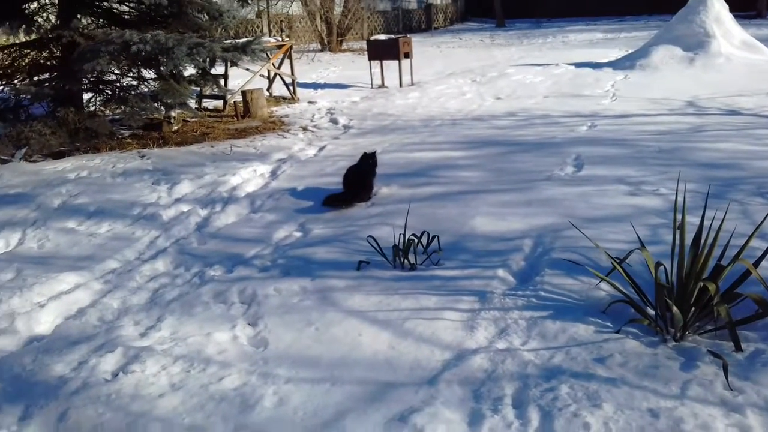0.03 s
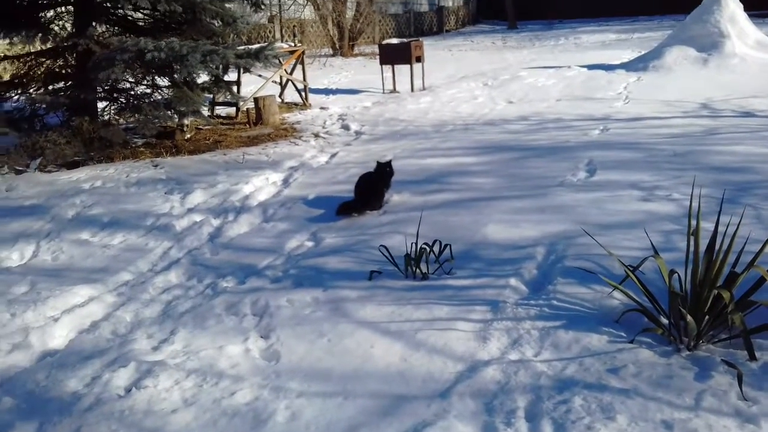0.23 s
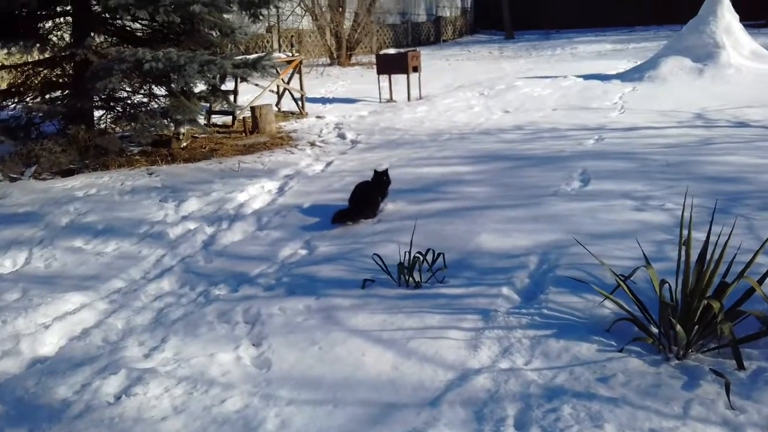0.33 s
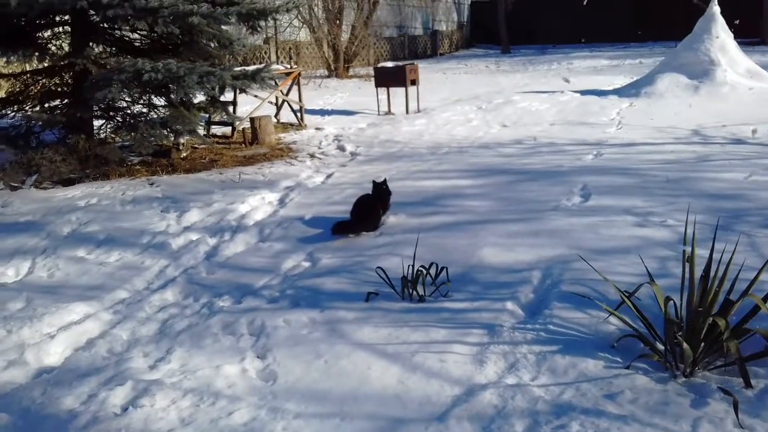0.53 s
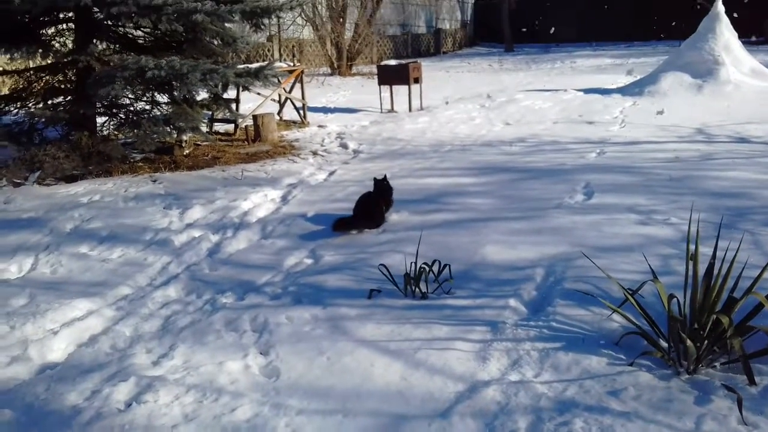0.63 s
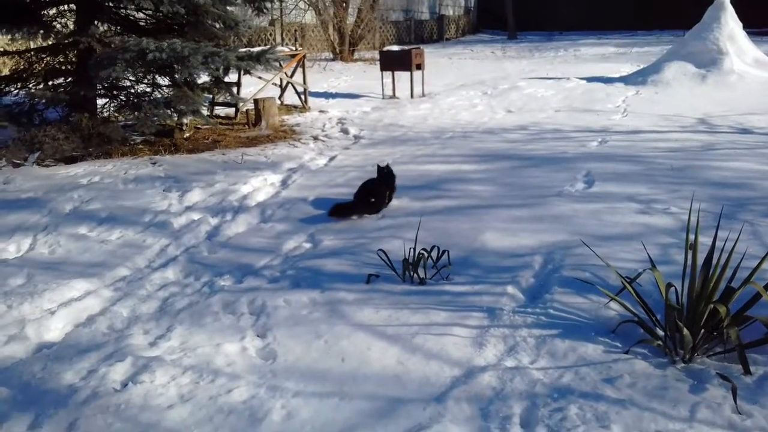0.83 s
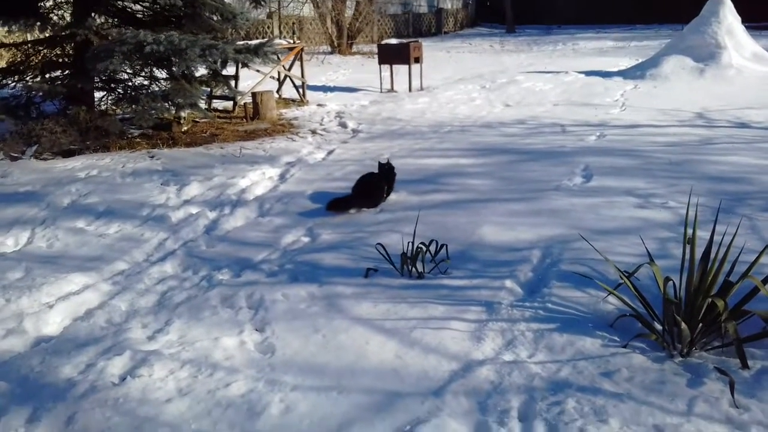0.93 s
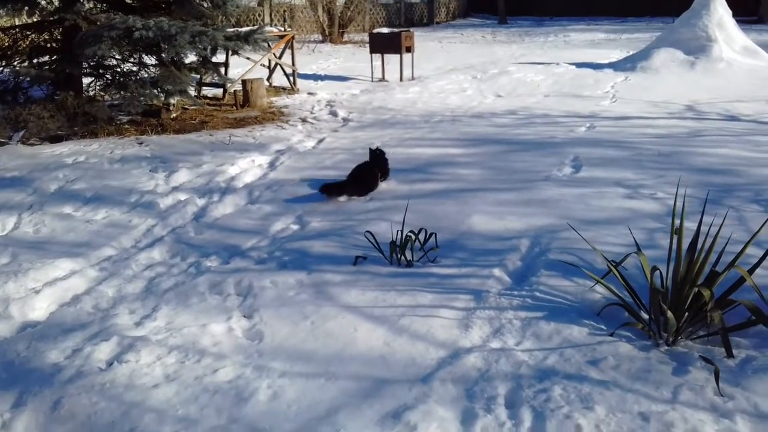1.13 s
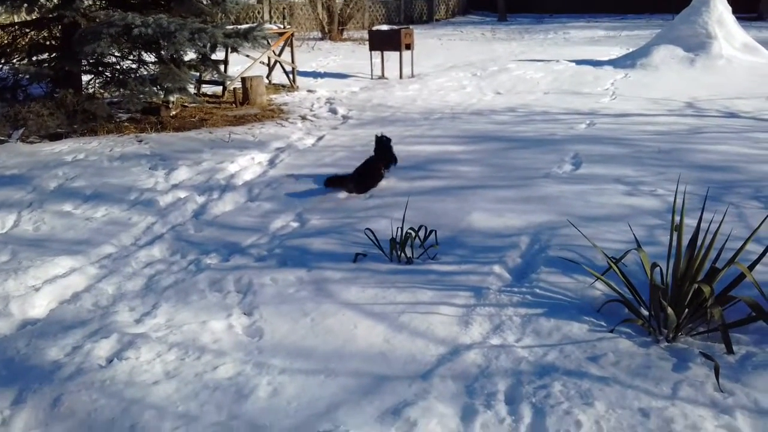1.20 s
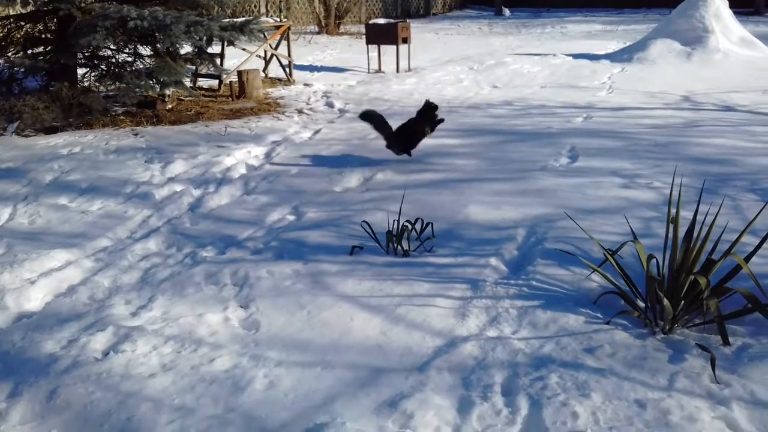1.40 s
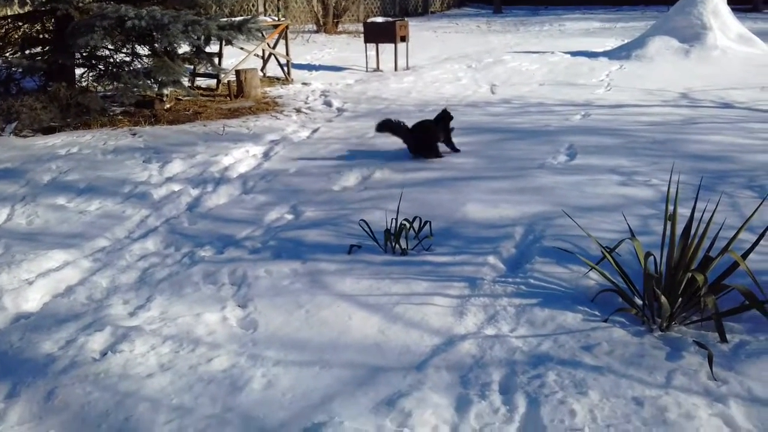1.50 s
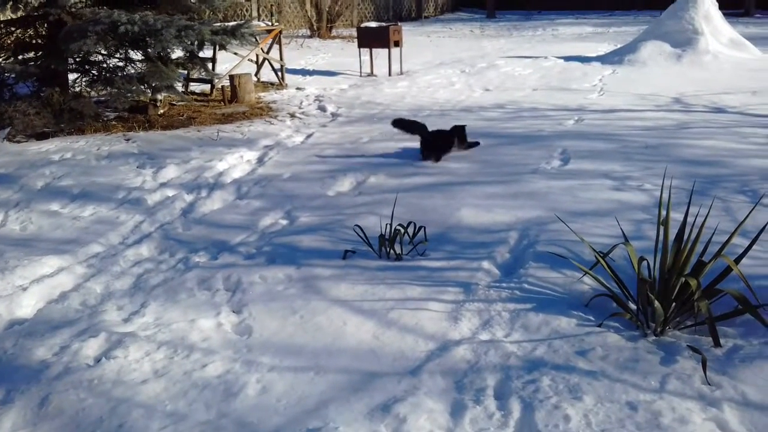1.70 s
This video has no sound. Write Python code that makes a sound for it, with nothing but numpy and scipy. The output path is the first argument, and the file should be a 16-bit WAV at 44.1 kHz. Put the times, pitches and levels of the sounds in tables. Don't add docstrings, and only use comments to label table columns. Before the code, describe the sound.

Close, bright snow crunch in two fast presses with a soft thud, then a thinning icy crackle and a few tiny snaps; sparrows chirp in the distance over a faint hum in a quiet yard.

```python
import sys
import numpy as np
from scipy import signal
from scipy.fft import rfft, irfft, next_fast_len
from scipy.io import wavfile
from scipy.ndimage import uniform_filter1d, map_coordinates

SR = 44100
rng = np.random.default_rng(int(sys.argv[2]) if len(sys.argv) > 2 else 0)


def digitize_waveform(pressure):
    field = np.atleast_2d(pressure).T
    bounded = np.clip(field, -1, 1)
    quanta = np.round(bounded * 32767).astype(np.int16)
    wavfile.write(sys.argv[1], SR, quanta)


def invert_db(x):
    u = np.asarray(x, float) / 20
    return 10 ** u


N = 77175

# [f/Hz, level/dB]
TOWN_TONE = [(30, -11.5), (90, -17.5), (350, -10), (1000, -9.5), (1720, -10), (1820, -13.5), (5500, -26.5),
             (15000, -36)]
# [t/s, level/dB]
MOTOR_LEVEL = [(0.0, -86), (0.028, -108), (0.316, -81), (0.55, -79), (0.642, -75.5), (1.038, -78),
               (1.076, -73.5), (1.368, -71.5), (1.676, -79), (1.75, -68)]
# [f/Hz, width/Hz, level/dB, fade/(dB per s)]
MACHINES = [
    (1142, 110, -66.5, -7),
    (1566, 83, -75, -0.5),
    (600, 45, -83, -2),
]
# [t/s, length/s, start f/Hz, end f/Hz, level/dB]
NEAR_CHIRPS = [(.151, .012, 5750, 5950, -68), (.161, .017, 5950, 5150, -60), (.186, .034, 5300, 5600, -74),
               (.213, .016, 3650, 5650, -62), (.229, .016, 5650, 4600, -60), (.935, .011, 5950, 5500, -67),
               (.942, .015, 5600, 5200, -60), (.971, .013, 5750, 5250, -66), (.997, .012, 5600, 5300, -72),
               (1.026, .008, 5600, 5350, -71), (1.066, .03, 5500, 5250, -73),
               (1.005, .015, 5000, 3400, -67), (1.025, .024, 3500, 4500, -68)]
# [t/s, length/s, start f/Hz, end f/Hz, level/dB]
HEDGE_CHIRPS = [(.024, 0.013, 4170, 4240, -62), (.032, 0.0047, 5300, 5380, -58.5),
                (.036, 0.012, 4270, 4950, -66), (.05, 0.0046, 3950, 3720, -58),
                (.055, 0.025, 3210, 3350, -62), (.06, 0.0118, 4430, 3440, -65),
                (.118, 0.024, 7100, 6900, -73), (.13, 0.024, 2465, 2480, -66),
                (.165, 0.011, 3050, 3000, -63), (.272, .025, 3400, 2550, -54),
                (.433, .009, 4650, 3700, -56), (.44, .018, 3850, 2800, -53), (.441, .009, 4550, 3800, -57),
                (.463, .01, 2600, 2950, -52), (.717, 0.0225, 3790, 2670, -58),
                (.735, .014, 5290, 3960, -59), (.744, .016, 3920, 3430, -61), (.834, .009, 3880, 3400, -65),
                (.842, 0.016, 3310, 3150, -64.5), (.958, 0.014, 3560, 4290, -69),
                (1.305, .012, 4830, 3430, -69), (1.345, 0.0166, 3330, 4050, -68.5),
                (1.36, .022, 4100, 4360, -71.5)]
# [t/s, length/s, start f/Hz, end f/Hz, level/dB]
ARCHED_CHIRPS = [
    (.691, .029, 4050, 3800, -56),
]
# [t/s, peak level/dB]
CRYSTAL_SNAPS = [
    (1.045, -55),
    (1.098, -57),
    (1.386, -43),
    (1.5529, -39),
    (1.553, -49),
    (1.5536, -45),
    (1.5845, -47),
    (1.5893, -47),
    (1.621, -59),
]
# [peak t/s, level/dB, rise/s, fall/s, low crush against crackle/dB]
SNOW_PRESSES = [(.1, -74.5, 0.14, 0.6, 16.5), (0.235, -45, .014, 0.024, -1),
                (0.269, -34.5, 0.043, 0.044, -26), (0.353, -38.5, 0.073, 0.095, 1.5),
                (0.536, -50.5, 0.11, 0.12, 4.5), (.665, -50.5, 0.15, 0.11, 3), (0.828, -58, 0.27, 0.14, 8),
                (1.11, -61.5, 0.011, 0.061, -8), (1.0, -95, .1, 0.057, -2), (1.33, -68.5, 0.11, .1, 10.5),
                (1.405, -56.5, 0.034, 0.073, -25), (1.59, -74, 0.18, 0.043, 13),
                (1.74, -76.5, 0.1, .08, 16)]
# [f/Hz, level/dB]
CRACKLE_TONE = [(100, -45), (1000, -9.5), (2500, -14), (5500, -10.5), (8000, -7.5), (12000, -10),
                (15500, -11)]
# [f/Hz, level/dB]
CRUSH_TONE = [(100, -13), (400, -8.5), (900, -5.5), (2000, -2), (4000, -9), (7000, -12.5)]
# [f/Hz, level/dB]
HISS_TONE = [(24, -50), (40, -8), (179, 4), (485, 1), (1460, -6.5), (1650, -6), (2120, -4.5),
             (15600, -11.5)]
# [f/Hz, level/dB]
SLIP_TONE = [(1000, -16), (5000, -8), (8800, -2), (9200, -45), (13600, -45), (14000, -3)]

TOWN_DB, TOWN_FADE_DB_PER_S = -61.5, -2
MOTOR_HZ, MOTOR_DRIFT_HZ = 58, 2.6
RASP_DB, RASP_HZ = 4, 55
NEAR_ECHO_DB, HEDGE_ECHO_DB, ARCH_ECHO_DB = -8, -5, -12
ECHO_T60_S, ARCH_HZ = .4, 430
SNAP_DB, SNAP_T60_S, SNAP_HZ = -9.5, .0012, 9000
THUD_S, THUD_DB, THUD_HZ, THUD_T60_S = .3345, -38, 270, .011
BREAKS_PER_S, SIZE_DB, CLUMP_DB, CLUMPS_PER_S = 22000, 1.8, 1.3, 450
SWELL = 1.8
CRUSH_DB = -11.5
BRIGHTER_DB_PER_DB, TOP_FROM_HZ = 1.6, 11800
PORT_HZ, PORT_WIDTH_HZ, PORT_DB = 9850, 1180, 14
HISS_DB = -74.5
SLIP_S, SLIP_LENGTH_S = .635, .011
CEILING, KNEE = .075, 3
TOP_HZ, OFFSET = 15750, -.0005


def unit(x):
    return x / np.sqrt(np.mean(x ** 2) + 1e-20)


def along(points, hz):
    f, db = np.transpose([(2.8, -88)] + list(points))
    return invert_db(np.interp(np.log(hz + 1), np.log(f + 1), db))


def wobble(rate):
    knots = rng.standard_normal(N // 20)
    return map_coordinates(knots, [np.arange(N) * min(rate, 2000) / SR])


def filtered(x, response):
    m = next_fast_len(N + 8192)
    return irfft(rfft(x, m) * response(np.fft.rfftfreq(m, 1 / SR)), m)[..., :N]


def port(hz):
    damping = 1j * hz * PORT_WIDTH_HZ
    return 1 + invert_db(PORT_DB) * damping / (PORT_HZ ** 2 - hz ** 2 + damping)


def town():
    t = np.arange(N) / SR
    spectrum = signal.stft(rng.standard_normal(N), nperseg=512)[2]
    patches = uniform_filter1d(rng.standard_normal(spectrum.shape), 6, 0)
    patches = uniform_filter1d(patches, 14, 1)
    air = signal.istft(spectrum * invert_db(0.97 * unit(patches)), nperseg=512)[1][:N]
    air = unit(filtered(air, lambda hz: along(TOWN_TONE, hz)))
    air = invert_db(TOWN_DB + TOWN_FADE_DB_PER_S * t) * air

    s, db = np.transpose(MOTOR_LEVEL)
    motor_hz = MOTOR_HZ + MOTOR_DRIFT_HZ * wobble(5.1)
    loudness = np.sqrt(2) * invert_db(np.interp(t, s, db) + 1.4 * wobble(8.7))
    return air + loudness * np.sin(2 * np.pi * np.cumsum(motor_hz) / SR)


def drones():
    t, out = np.arange(N) / SR, np.zeros(N)
    for c_hz, w_hz, db, fade_db in MACHINES:
        band = filtered(rng.standard_normal(N), lambda hz: np.exp(-((hz - c_hz) / w_hz) ** 2))
        out += invert_db(db + fade_db * t + 2.5 * wobble(6.7)) * unit(band)
    return out


def birds(chirps, echo_db, arch_hz=0):
    out = np.zeros(N)
    rasp, waver_hz = invert_db(RASP_DB * wobble(350)), RASP_HZ * wobble(250)
    for s, length, a_hz, b_hz, db in chirps:
        start = round(s * SR)
        u = np.arange(round(length * SR)) / (length * SR)
        hz = a_hz + (b_hz - a_hz) * u + arch_hz * np.sin(np.pi * u)
        hz = hz + waver_hz[start:][:len(u)]
        whistle = np.sin(2 * np.pi * np.cumsum(hz) / SR)
        out[start:][:len(u)] += invert_db(db + 1.5) * np.sin(np.pi * u) ** .5 * whistle
    out = out * rasp
    t = np.arange(SR // 3) / SR
    tail = rng.standard_normal(len(t)) * invert_db(-60 * t / ECHO_T60_S) * (t > .004)
    return out + invert_db(echo_db) * signal.fftconvolve(out, tail / np.linalg.norm(tail))[:N]


def snaps():
    out, t = np.zeros(N), np.arange(2048) / SR
    for s, db in CRYSTAL_SNAPS:
        ring = invert_db(db + SNAP_DB - 60 * t / SNAP_T60_S) * np.cos(2 * np.pi * SNAP_HZ * t)
        out[round(s * SR):][:len(t)] += ring
    return out


def thud():
    out, t = np.zeros(N), np.arange(2048) / SR
    swell = invert_db(THUD_DB - 60 * t / THUD_T60_S) * (1 - np.exp(-t / 0.0017))
    out[round(THUD_S * SR):][:len(t)] += swell * np.sin(2 * np.pi * THUD_HZ * t)
    return out


def breaks():
    hit = rng.random(N) < BREAKS_PER_S / SR
    size, sign = rng.exponential(size=N), rng.standard_normal(N)
    level_db = SIZE_DB * np.minimum(size, 3) + CLUMP_DB * wobble(CLUMPS_PER_S) + .8 * wobble(45)
    return hit * sign * invert_db(level_db)


def snow():
    t = np.arange(N) / SR
    fine, finest, deep = np.zeros((3, N))
    for s, db, rise, fall, depth_db in SNOW_PRESSES:
        distance = np.abs(t - s) / np.where(t < s, rise, fall)
        power = invert_db(db - 20 * distance ** SWELL) ** 2
        fine = fine + power
        deep = deep + power * invert_db(depth_db) ** 2
        finest = finest + power * invert_db(BRIGHTER_DB_PER_DB * np.clip(db + 49, -4, 0)) ** 2

    hail = breaks()
    crackle = filtered(hail, lambda hz: along(CRACKLE_TONE, hz))
    crackle = crackle / np.std(filtered(crackle, port))
    top = filtered(crackle, lambda hz: 1 / (1 + np.exp((TOP_FROM_HZ - hz) / 400)))
    crush = 0.41 * unit(hail) + unit(breaks())
    crush = unit(filtered(crush, lambda hz: along(CRUSH_TONE, hz)))
    return np.sqrt(fine) * (crackle - top) + np.sqrt(finest) * top + invert_db(CRUSH_DB) * np.sqrt(deep) * crush


def scene():
    song = birds(NEAR_CHIRPS, NEAR_ECHO_DB) + birds(HEDGE_CHIRPS, HEDGE_ECHO_DB)
    song = song + birds(ARCHED_CHIRPS, ARCH_ECHO_DB, arch_hz=ARCH_HZ)
    mono = town() + drones() + song + snaps() + thud() + snow()
    return np.array([mono, mono])


def channel_slip(x):
    spectrum = signal.stft(x, nperseg=1024)[2]
    turned = spectrum * np.exp(2j * np.pi * rng.random(spectrum.shape))
    scrambled = signal.istft(turned, nperseg=1024)[1][:N]
    moment = np.exp(-((np.arange(N) / SR - SLIP_S) / SLIP_LENGTH_S) ** 2)
    slip = filtered(scrambled * moment, lambda hz: along(SLIP_TONE, hz))
    return np.array([slip, -slip])


def top_cut(x):
    return signal.sosfilt(signal.butter(12, 15740, fs=SR, output="sos"), x)


def record(dry):
    x = filtered(dry, lambda hz: port(hz) * hz ** 2 / (hz ** 2 + 31 ** 2))
    hiss = filtered(rng.standard_normal((2, N)), lambda hz: along(HISS_TONE, hz))
    hiss = invert_db(HISS_DB) * unit(hiss)
    slip = channel_slip(x[0])
    x = x / (1 + np.abs(x / CEILING) ** KNEE) ** (1 / KNEE)
    x = filtered(x + hiss + slip, lambda hz: hz < TOP_HZ)
    return top_cut(x + OFFSET)


dry = scene()
out = record(dry)
digitize_waveform(out)
```